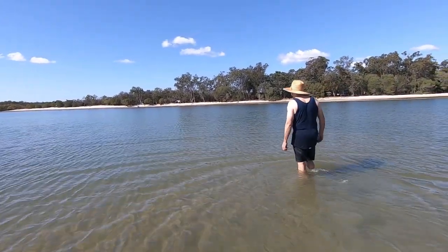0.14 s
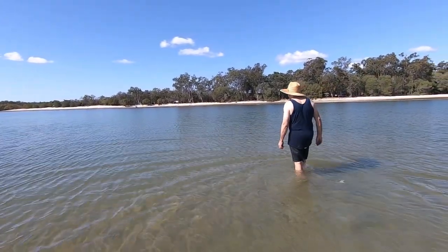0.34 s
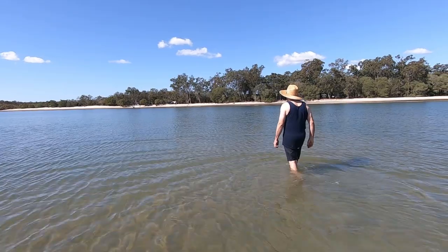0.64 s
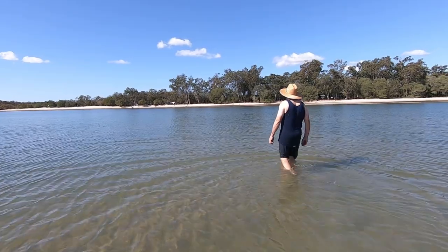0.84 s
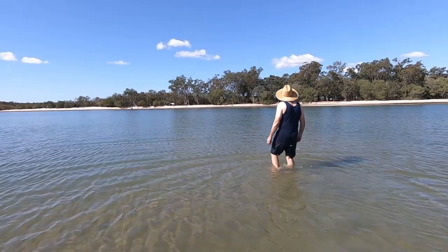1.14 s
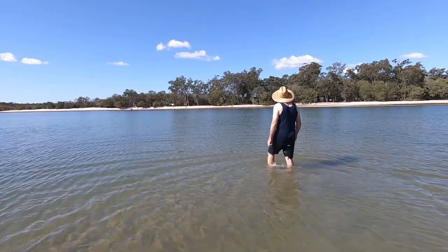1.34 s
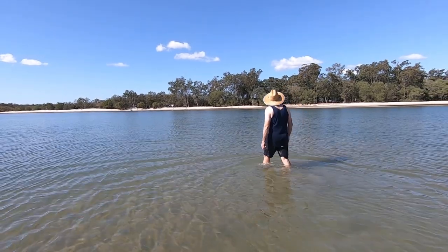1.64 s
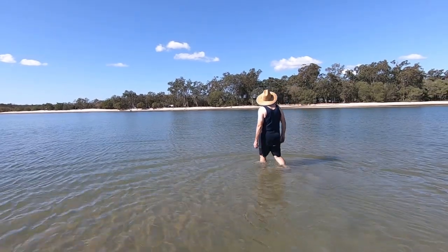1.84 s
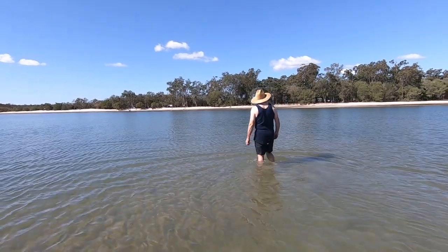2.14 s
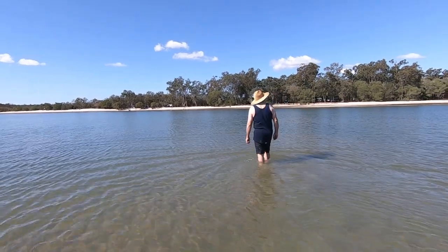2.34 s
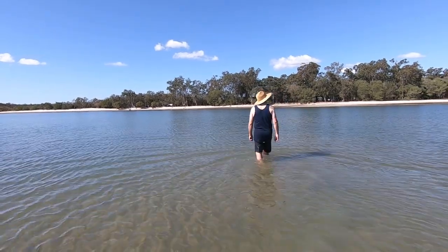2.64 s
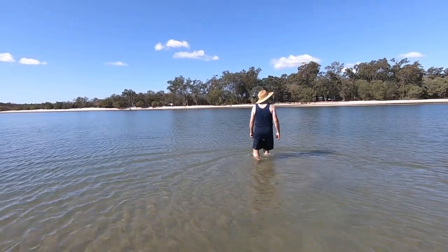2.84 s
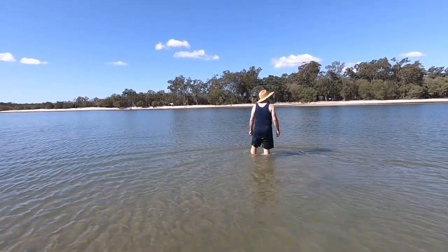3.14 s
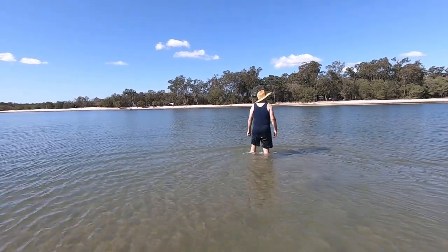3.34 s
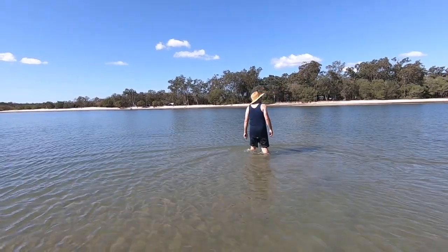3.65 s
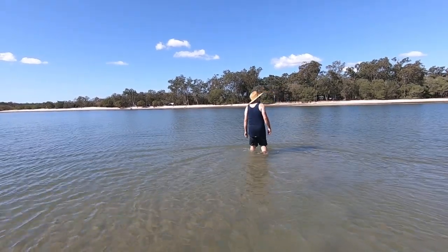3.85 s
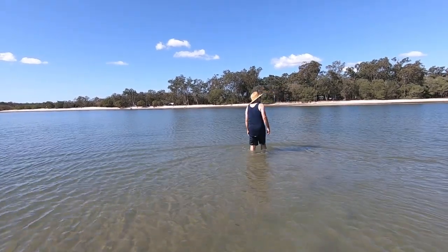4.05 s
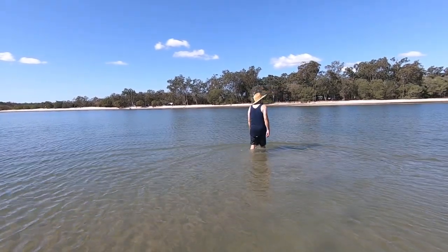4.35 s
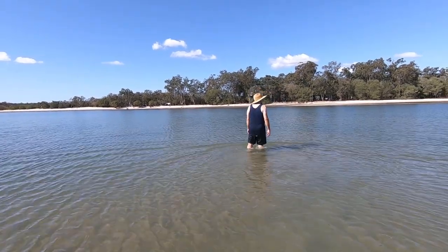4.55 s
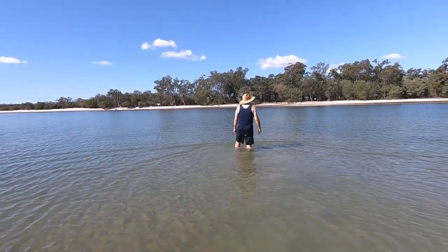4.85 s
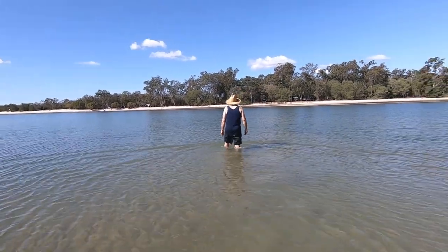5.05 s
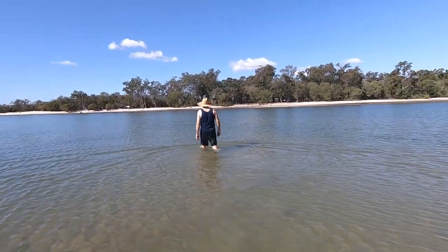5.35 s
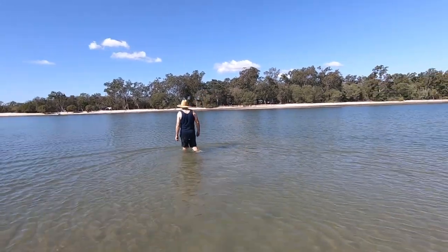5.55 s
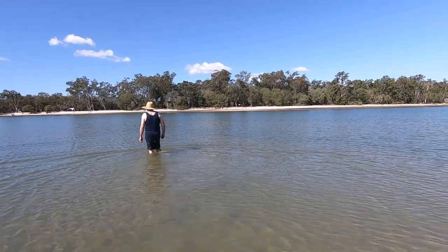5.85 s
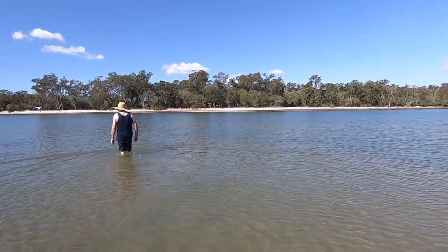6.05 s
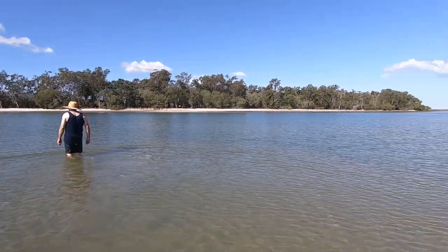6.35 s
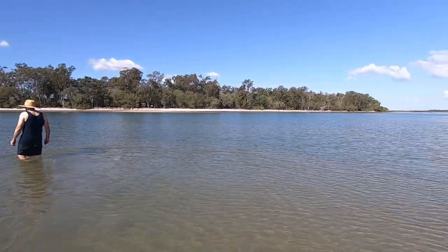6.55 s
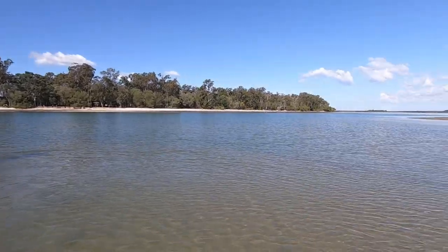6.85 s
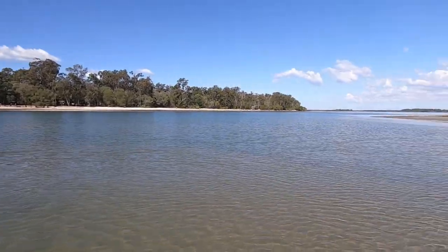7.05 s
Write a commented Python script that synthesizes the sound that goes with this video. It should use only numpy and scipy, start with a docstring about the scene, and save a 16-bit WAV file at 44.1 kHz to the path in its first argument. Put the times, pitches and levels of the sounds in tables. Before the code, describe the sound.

Close, wet wading sounds come first and loudest, slightly right of centre: sloshing surges, bubbling air pockets, bright droplets and fine spray. Uneven wind rumbles and thumps against the camera microphone, strongest around four and a half seconds. Later strides grow quieter and drift left as the camera turns. The wind then drops, uncovering soft lapping, a few drips, faint shore wash and a short wavering hum.

```python
"""Shallow water by an open shore: someone wades past a hand-held camera, close by, about a stride a second.
Each stride pushes up a wave: bubble swarms gurgle, noise grains and snaps make splash and spray, drops trickle.
Larger pockets of air plop as gliding sines, drops slap as short noise bursts, and soft ripples lap late on.
Wind noise buffets the two microphone ports apart, then drops as the camera turns; near the end a low
wavering sine hums up briefly. A faint, steady noise is the wash of the shore."""
import sys
import numpy as np
from scipy import signal
from scipy.fft import rfft, irfft
from scipy.io import wavfile
from scipy.ndimage import uniform_filter1d

SR = 44100
rng = np.random.default_rng(int(sys.argv[2]) if len(sys.argv) > 2 else 0)


def wrap_up_sound(samples):
    """Save the sound to the file named by the first command line argument, as 16-bit audio."""
    columns = np.atleast_2d(samples).T
    # keep every value between -1 and 1, then stretch to whole-number steps
    tamed = np.clip(columns, -1, 1)
    steps = np.round(tamed * 32767).astype(np.int16)
    wavfile.write(sys.argv[1], SR, steps)


N = 317067
TIME = np.arange(N) / SR
FREQS = np.fft.rfftfreq(N, 1 / SR)


def amp(db):
    """Decibels to gain."""
    return 10 ** (np.asarray(db) / 20)


def unit(x):
    """Scales to rms 1."""
    return x / np.sqrt(np.mean(x ** 2) + 1e-20)


def follow(rows, t=TIME):
    """The columns of a curve table, joined by straight lines, at the times t."""
    s, *columns = np.transpose(rows)
    return [np.interp(t, s, column) for column in columns]


def read(points):
    """A spectrum table on the frequency grid, straight over log frequency."""
    hz, value = np.transpose(points)
    return np.interp(np.log(FREQS + 1), np.log(hz), value)


def shaped(x, spectrum):
    """Filters x by a spectrum table and scales it to rms 1."""
    return unit(irfft(rfft(x) * amp(read(spectrum)), N))


def drift(hz):
    """Random motion up to about the rate hz, rms 1."""
    return unit(irfft(rfft(rng.standard_normal(N)) * np.exp(-(FREQS / hz) ** 2), N))


def bump(s, length):
    """A smooth swell of height 1 around time s; length is its width at 1/e of the height."""
    return np.exp(-(2 * (TIME - s) / length) ** 2)


def panned(pan_db):
    """Left and right gains whose mean is 1; positive is to the left."""
    ratio = amp(np.atleast_1d(pan_db))
    return 2 * np.array([ratio, np.ones_like(ratio)]) / (1 + ratio)


def add(mix, s, sound):
    """Lays a sound into the mix from time s on."""
    part = mix[..., max(round(s * SR), 0):][..., :sound.shape[-1]]
    part += sound[..., :part.shape[-1]]


def bubble(hz, glide, swell):
    """A pocket of air rings as it pinches off; its pitch slides as it nears the surface. Peaks at 2 swell."""
    t = np.arange(0, 8 * swell, 1 / SR) - 2 * swell
    u = np.maximum(t / (2 * swell) + 1, 0)
    envelope = (u * np.exp(1 - u)) ** 4
    # glide in octaves per second, by one octave upwards at most
    pitch = hz * np.exp2(np.minimum(glide * t, 1))
    return envelope * np.sin(2 * np.pi * np.cumsum(pitch) / SR)


def swarm(low_hz, high_hz, busy, cycles, spread_db, glide, count):
    """Bubbles of random size and pitch, more crowded where the water is busy."""
    out = np.zeros(N)
    when, kept, pitch, life, rise, size = rng.random((count, 6)).T
    hz = low_hz * (high_hz / low_hz) ** pitch
    swell = np.clip(cycles, .5, 5) * (.25 + 1.5 * life ** 2) / np.sqrt(hz * low_hz)
    # many faint bubbles, a few strong ones
    gain = amp(spread_db * np.minimum(-np.log(size + 1e-9), 4)) * np.sqrt(hz)
    slide = glide * (1.05 * rise - .3)  # most rise, some fall
    sounding = kept < busy[(when * N).astype(int)]
    for k in np.nonzero(sounding)[0]:
        add(out, when[k] * TIME[-1], gain[k] * bubble(hz[k], slide[k], swell[k]))
    # crowding changes the density, not the level
    return unit(out / np.sqrt(busy))


def patter(per_s, spread_db, decay):
    """Droplets tick on the surface as grains of noise: many faint ones, a few sharp ones."""
    chance, size = rng.random((2, N))
    ticks = chance < per_s / SR
    power = ticks * amp(spread_db * np.minimum(-np.log(size + 1e-9), 5)) ** 2
    t = np.arange(0, 12 * decay, 1 / SR) / decay
    grain_power = signal.oaconvolve(power, t ** 2 * np.exp(-1.5 * t))[:N]
    return unit(np.sqrt(abs(grain_power)) * rng.standard_normal(N))


def crackle(low_hz, high_hz, per_s, cycles, spread_db, count=36):
    """Tiny bubbles snap shut: each starts at once and rings for a few cycles on one of count pitches."""
    out, t = np.zeros(N), np.arange(700) / SR
    chance, size, kind = rng.random((3, N))
    snaps = (chance < per_s / SR) * amp(spread_db * np.minimum(-np.log(size + 1e-9), 3.5))
    pitch_index = (kind * count).astype(int)
    for k, hz in enumerate(np.geomspace(low_hz, high_hz, count)):
        ring = np.exp(-t * hz / cycles) * np.sin(2 * np.pi * hz * t * (1 + t))
        for at in np.nonzero((pitch_index == k) & (snaps > 0))[0]:
            add(out, at / SR, snaps[at] * ring)
    return unit(out)


def drips(count=300):
    """Single drips off the legs and hands: each traps a bubble that rings a little longer, mostly rising."""
    return swarm(1150, 4800, np.ones(N), cycles=3.6, spread_db=1.8, glide=9, count=count)


FROTH_S, FROTH_SHARE = .012, .3  # decay time [s] and strength of the fizz


def froth(x):
    """Each burst sets off a short fizz of smaller ones, which joins the grains into a wash."""
    t = np.arange(0, .08, 1 / SR)
    tail = rng.standard_normal(len(t)) * np.exp(-t / FROTH_S)
    random_sign = np.sign(drift(150))
    fizz = signal.oaconvolve(x * random_sign, tail / np.linalg.norm(tail))[:N]
    return x + FROTH_SHARE * fizz


def churn(x, patch_db, patch_hz, patch_s):
    """Tumbling water: clouds of bubbles come and go, each in its own part of the spectrum."""
    f, t, z = signal.stft(x, SR, nperseg=256, noverlap=192)
    across = np.fft.fftfreq(len(f), f[1])[:, None]
    along = np.fft.fftfreq(len(t), t[1])
    blur = np.exp(-(across * patch_hz) ** 2 - (along * patch_s) ** 2)
    patches = unit(np.fft.ifft2(np.fft.fft2(rng.standard_normal(z.shape)) * blur).real)
    return unit(signal.istft(z * amp(patch_db * patches), SR, nperseg=256, noverlap=192)[1][:N])


# resonances and dips of the camera housing: (centre [Hz], width [Hz], level [dB])
HOUSING = [(815, 300, 5.5), (1017, 167, -10), (1343, 260, 3.5), (1560, 160, -4.5), (1974, 440, 3.5),
           (2207, 137, -5.5), (2520, 290, 2.5), (2740, 106, -4), (3200, 600, 0), (3450, 100, -7),
           (3700, 560, 3.5), (4430, 220, 4.5), (5540, 740, 2.5), (8440, 290, -3), (9000, 590, 7.5)]


def housing(x):
    """The camera body colours what reaches the microphone ports."""
    colour_db = sum(db * np.exp(-2 * ((FREQS - hz) / width) ** 2) for hz, width, db in HOUSING)
    return irfft(rfft(x) * amp(colour_db), N)


CREST_DROP_DB = 22  # how far below its crest a splash is at the ends of its build-up and collapse
TRICKLE_S = 1.0  # water running off the leg fades by as much in this time
BUILD_CURVE = 0.95  # 1 builds evenly in dB; above 1 grows fast at first and rounds off towards the crest


def stride(crest, splash_db, build_s, collapse_s, trickle_db, lead_s=0):
    """Level in dB of one stride: the wave builds up and collapses, then water trickles off the leg."""
    t = TIME + lead_s - crest
    before, after = np.maximum(-t, 0), np.maximum(t, 0)
    wave = amp(splash_db - CREST_DROP_DB * after / collapse_s)
    trickle = amp(trickle_db - CREST_DROP_DB * (after / TRICKLE_S) ** 2)
    build_up_db = CREST_DROP_DB * (before / build_s) ** BUILD_CURVE
    return 20 * np.log10(np.hypot(wave, trickle) + 1e-12) - build_up_db


# surges of the strides close to the camera, levels before the trims in wading():
# (crest time [s], splash level [dB], build-up [s], collapse [s], trickle level [dB],
#  gurgle re splash [dB], spray re splash [dB]), the last two at the reference splash level
STRIDES = [(0.286, -45.5, 0.22, 0.3, -55.5, -3, -16), (1.366, -47, 0.31, 0.45, -65, -4, -17.5),
           (2.377, -52, 0.33, 0.6, -60, -5.5, -17.5), (2.48, -53.5, 0.11, 0.29, -84, -3, -20.5),
           (3.279, -53.5, 0.74, 0.56, -59.5, -3.5, -15), (4.161, -51.5, 0.32, 0.26, -55, -4, -16.5),
           (5.03, -59.5, 0.25, 0.48, -82, 1.5, -14), (5.998, -54.5, 0.35, 0.21, -61, -1.5, -18)]
REFERENCE_DB = -56.5  # the splash level at which the gurgle and spray of a stride are given
GURGLE_LEAD_S, GURGLE_SLOPE = 0.0077, 1  # the leg traps air before the wave breaks; dB per dB of splash
SPRAY_LEAD_S, SPRAY_SLOPE = 0.0069, 0.92  # the same for the spray
CALM_DB = -79  # splash and gurgle between strides


def stride_levels():
    """Levels in dB of splash, gurgle and spray; the last two lead a little and the spray swings less widely."""
    power = np.zeros((3, N))
    power[:2] = amp(CALM_DB) ** 2
    for *shape, gurgle_db, spray_db in STRIDES:
        gurgle_swing = GURGLE_SLOPE * (stride(*shape, GURGLE_LEAD_S) - REFERENCE_DB)
        spray_swing = SPRAY_SLOPE * (stride(*shape, SPRAY_LEAD_S) - REFERENCE_DB)
        gurgle = REFERENCE_DB + gurgle_db + gurgle_swing
        spray = REFERENCE_DB + spray_db + spray_swing
        power += amp([stride(*shape), gurgle, spray]) ** 2
    return 10 * np.log10(power + 1e-20)


# spectra of the three layers of wading: (frequency [Hz], relative level [dB per Hz])
GURGLE = [(200, 5), (350, -5), (520, -2), (750, 1.5), (950, -5.5), (1200, -9), (2000, -57.5)]
SPLASH = [(500, -15), (900, 2), (1200, -1), (2000, -3), (3200, -2.5), (4200, -11), (5200, -14.5),
          (8000, -32.5)]
SPRAY = [(2500, -12.5), (4000, 2.5), (4900, 2), (6500, 6), (8000, -1.5), (9000, -7), (10200, -3.5),
         (11500, -16.5), (13000, -21.5)]


def wading():
    """Every stride churns up deep gurgles, a dense froth of small bubbles and fine spray, in uneven spurts."""
    splash_db, gurgle_db, spray_db = stride_levels()
    busy = np.clip(amp(.5 * (splash_db + 51)), .5, 1)
    spurts = drift(18)

    gurgle = swarm(280, 1150, busy, cycles=2.1, spread_db=2, glide=23, count=2200)
    gurgle += patter(600, 2.4, .003)

    splash = swarm(1000, 5060, busy, cycles=1.8, spread_db=2.9, glide=18, count=11000)
    splash += 1.25 * patter(1500, 2.8, .0007)
    splash += .65 * crackle(1100, 6000, per_s=800, cycles=5.5, spread_db=3.9)
    splash += .36 * drips() / np.sqrt(2 * busy)  # drips stand out more in calm water
    splash += .6 * patter(36, 2, .0006)
    splash = churn(froth(splash), patch_db=1.8, patch_hz=520, patch_s=.025)

    spray = .7 * crackle(3800, 10500, per_s=600, cycles=14, spread_db=4.2)
    spray += patter(1100, 3.5, .0007)
    spray += .55 * patter(24, 2.4, .0004)
    spray = churn(spray, patch_db=2.4, patch_hz=900, patch_s=.025)

    # level of each layer: stride, spurts, trim
    water = shaped(gurgle, GURGLE) * amp(gurgle_db + 2 * spurts - 3)
    water += shaped(splash, SPLASH) * amp(splash_db + 1.2 * spurts - 1.1)
    water += shaped(spray, SPRAY) * amp(spray_db + 1.9 * spurts - 1.5)
    return housing(water)


# how alike the two microphone ports hear the water: (frequency [Hz], left-right likeness [-1 to 1])
LIKENESS = [(300, 1), (800, 0.81), (2500, 0.93), (4500, 0.98), (6500, 0.49), (8500, -0.47), (11000, -0.067)]


def ports(x, pan_db, corner_hz=4000, treble_share=.2):
    """Two ports hear the same sound; the body scatters the treble, which is less alike and less to one side."""
    t = np.arange(256) / SR
    scatter = rfft(rng.standard_normal(len(t)) * np.exp(-t / 0.0025), N)
    same = np.clip(read(LIKENESS), -.7, .999)
    # a quarter-turn signal of random sign, added on one side and taken off on the other
    side_gain = 1j * np.sign(scatter.real) * np.sqrt((1 - same) / (1 + same))
    side = irfft(rfft(x) * side_gain, N)
    pair = np.array([x + side, x - side])
    low = irfft(rfft(pair) * np.exp(-(FREQS / corner_hz) ** 4), N)
    return low * panned(pan_db) + (pair - low) * panned(treble_share * pan_db)


# changing wind at the ports, before the ceiling in wind():
# (time [s], left rumble level [dB], right rumble level [dB])
WIND = [(0, -37.5, -37.5), (.18, -38, -37.5), (.45, -33.5, -33.5), (.65, -34.5, -29), (.95, -34.5, -33.5),
        (1.1, -38.5, -28), (1.65, -34.5, -30.5), (1.95, -35, -42.5), (2.1, -40, -41), (2.45, -34, -30),
        (2.65, -44, -34.5), (3.1, -38.5, -30.5), (3.5, -37.5, -31.5), (3.8, -33, -32), (4.4, -29, -29),
        (4.82, -40.5, -39.5), (5.18, -39.5, -33.5), (5.4, -32, -37.5), (6.02, -34.5, -37),
        (6.35, -57, -57.5), (6.7, -79, -74), (7.19, -64, -59)]
# short gusts on top of it: (peak time [s], length [s], rumble level [dB], left-right [dB])
GUSTS = [(1.145, 0.14, -26.5, 4), (1.445, 1, -37, -8), (3.227, 0.2, -33.5, 15.5), (4.117, 0.25, -27, 2.5),
         (4.339, 0.044, -28, 18), (4.497, 0.15, -24, -5.5), (4.971, 0.086, -31, -6),
         (7.18, 0.062, -46.5, -13)]


def wind_levels():
    """Rumble in dB at each port: the changing wind plus its gusts, added as power."""
    power = amp(follow(WIND)) ** 2
    for s, length, db, side_db in GUSTS:
        power += (amp(db) * panned(side_db) * bump(s, length)) ** 2
    return 10 * np.log10(power)


# spectra of the rumble and of the faster flutter: (frequency [Hz], relative level [dB per Hz])
RUMBLE = [(8, -7.5), (20, -10.5), (45, 0), (65, 0), (85, -5.5), (115, -6.5), (150, -27), (220, -29),
          (400, -100)]
BUFFET = [(70, -28.5), (120, 10.5), (160, 3), (210, -8), (290, -8), (410, -28), (700, -31.5), (1500, -87)]
# single eddies that thump a port, played 1.5 dB up and before the ceiling:
# (start time [s], envelope peak level [dB], centre [Hz], left-right [dB])
THUMPS = [(1.092, -18.5, 98, -40), (1.17, -24.5, 172, 31), (1.512, -24.5, 89.5, -38), (1.631, -25, 89, -28),
          (2.197, -27, 103, -26), (3.173, -28, 151, -18), (3.272, -23, 82, -8), (3.45, -24, 94, -24.5),
          (3.623, -36, 115, -14), (3.877, -20.5, 111, -36), (3.94, -32, 128, -26), (4.076, -22.5, 92, 31),
          (4.212, -31, 140, -13), (4.335, -35, 168, 22), (4.445, -33, 150, 5), (4.503, -30, 186, -17),
          (4.517, -12.5, 110, -39), (5.596, -22, 95, 31), (5.674, -35, 145, 21), (5.867, -28, 134, 16),
          (6.012, -34, 139, 18)]
FLUTTER_DB = (-22.5, -18.5)  # flutter relative to the rumble in a moderate wind, left and right port
MODERATE_DB, FLUTTER_SLOPE = -43.5, 0.69  # above this rumble the flutter gains this many extra dB per dB


def wind():
    """Turbulence presses on each port apart; its strongest lumps break into faster flutter and single thumps."""
    out = np.zeros((2, N))
    for port, rumble_db, moderate_db in zip(out, wind_levels(), FLUTTER_DB):
        rumble_swing = amp(3.54 * np.tanh(drift(22)))
        rumble = unit(shaped(rng.standard_normal(N), RUMBLE) * rumble_swing)
        lumps = np.tanh(abs(signal.hilbert(rumble)) / 2) ** 2.53
        flutter_swing = amp(2.1 * np.tanh(drift(16)))
        flutter = unit(shaped(rng.standard_normal(N), BUFFET) * lumps * flutter_swing)
        flutter_db = moderate_db + FLUTTER_SLOPE * np.maximum(rumble_db - MODERATE_DB, 0)
        port += amp(rumble_db) * (rumble + amp(flutter_db) * flutter)
    for s, db, hz, side_db in THUMPS:
        u = np.arange(0, 4 / hz, 1 / SR) * hz  # time in cycles
        envelope = (2 * u * np.exp(1 - 2 * u)) ** 2
        add(out, s, amp(db + 1.5) * panned(side_db) * envelope * np.sin(2 * np.pi * u))
    # the pressure of the strongest eddies levels off
    ceiling = .22
    swing = uniform_filter1d(abs(signal.hilbert(out)), 200)
    return out / (1 + (swing / ceiling) ** 4) ** (1 / 4)


# spectrum of the open shore: (frequency [Hz], relative level [dB per Hz])
AIR = [(30, -14.5), (150, 21), (300, 3), (500, -16.5), (800, 1), (2000, -13), (4500, -14), (6500, -23),
       (10000, -19.5), (11500, -36)]


def shore():
    """The faint wash of the open shore: steady shaped noise, separate at each port."""
    return amp(-62.0) * np.array([shaped(rng.standard_normal(N), AIR) for _ in range(2)])


# the largest drops and dollops that slap the surface, played level_db up:
# (peak time [s], peak level [dB], centre [Hz], spread [octaves], swell time [s])
DROPS = [(0.177, -45.5, 4000, .54, 0.004), (0.19, -38.5, 2420, 0.75, 0.0017),
         (0.287, -38, 2900, 0.62, 0.0063), (.308, -43, 2580, 0.23, 0.0014),
         (0.328, -39.5, 2350, 0.65, 0.0026), (.343, -38.5, 2400, 0.22, 0.0026),
         (0.443, -46.5, 3930, 0.39, 0.0021), (.526, -43, 2100, .35, 0.0032),
         (0.628, -49.5, 3580, 0.18, 0.0013), (0.767, -49.5, 2070, 0.25, 0.00046),
         (1.153, -42.5, 1820, 0.25, .003), (1.226, -46.5, 2900, 0.28, 0.0017),
         (1.234, -38.5, 2970, 0.5, 0.0013), (1.468, -41, 2840, 0.41, 0.002),
         (1.591, -45.5, 914, 0.59, 0.0023), (1.778, -44, 2350, 0.64, 0.0014),
         (1.795, -43, 1860, 0.42, 0.0032), (1.946, -54, 2730, .4, .002), (2.09, -52, 3700, 0.41, 0.0018),
         (2.212, -42.5, 1480, 0.44, 0.0044), (2.307, -46.5, 3240, 0.27, 0.0011),
         (2.346, -46.5, 2830, 0.69, 0.002), (2.484, -41.5, 1560, 0.22, 0.0023),
         (2.646, -41, 2990, 0.33, 0.0013), (2.758, -41, 3720, 0.51, 0.0018),
         (2.834, -45.5, 3270, 0.34, 0.00068), (3.048, -42, 2010, 0.53, 0.0021),
         (3.093, -46.5, 3180, .25, 0.0013), (3.283, -35.5, 3060, 0.87, 0.0018),
         (3.289, -38.5, 1860, 0.13, .002), (3.388, -43, 3240, 0.13, 0.0014),
         (3.587, -46.5, 3620, 0.13, 0.0018), (3.671, -44, 1460, 0.85, 0.0012),
         (3.706, -46, 2480, 0.18, .002), (3.839, -45, 3920, 0.38, 0.0012), (3.854, -46, 3720, 0.19, .0012),
         (3.865, -44, 2230, .25, 0.0012), (3.887, -51, 1970, 0.23, .0015), (3.977, -43, 2190, 0.17, 0.0016),
         (4.046, -36, 1820, 0.31, 0.0017), (4.083, -43.5, 1235, 0.77, 0.0013),
         (4.134, -45.5, 2860, 0.87, 0.0036), (4.142, -37.5, 3230, 0.33, 0.0018),
         (4.161, -47, 4680, 0.64, 0.0054), (4.175, -43.5, 1750, 0.19, 0.003),
         (4.191, -48.5, 6840, 0.14, 0.0012), (4.211, -40.5, 3080, 0.39, 0.0013),
         (4.231, -50.5, 4560, 0.41, 0.0043), (4.243, -48, 4860, 0.71, 0.002),
         (4.346, -53.5, 3580, .5, .001), (4.364, -44, 2790, 0.49, 0.0019), (4.4, -46.5, 3470, 0.5, .0022),
         (4.569, -47.5, 3200, 0.32, .0015), (4.669, -46, 3290, 0.48, 0.0017),
         (4.818, -53, 2370, 0.28, .0015), (5.011, -49.5, 3200, .45, .0012),
         (5.813, -50, 4640, 0.16, 0.0012), (5.984, -39, 2260, 0.45, 0.0013),
         (6.026, -42.5, 3200, 0.25, 0.0014), (6.168, -43.5, 1790, 0.16, 0.0016),
         (6.282, -47.5, 2890, 0.16, .0015), (6.3, -48, 3050, 0.23, 0.0023),
         (6.337, -52.5, 1400, .2, 0.0022), (6.512, -56.5, 4800, 0.25, .0012),
         (6.53, -57, 2920, 0.62, 0.0017), (6.679, -58.5, 4030, 0.61, .0015),
         (6.829, -54.5, 2900, 0.29, .0012), (6.917, -53, 2130, 0.57, 0.0018),
         (7.012, -50, 3030, 0.44, 0.0014), (7.179, -45.5, 1890, 0.37, 0.0046)]


def drops(ring=0.18, level_db=1):
    """A drop lands with a short, bright slap and traps a small bubble; a dollop lands more broadly."""
    out, t = np.zeros(N), np.arange(2048) / SR
    f = np.fft.rfftfreq(len(t), 1 / SR) + 1
    lead = .012  # s from the start of the burst to its peak
    for s, db, hz, octaves, swell in DROPS:
        u = np.maximum((t - lead) / (1.5 * swell) + 1, 0)
        burst = rng.standard_normal(len(t)) * (u * np.exp(-u)) ** 2
        colour = np.exp(-.5 * (np.log2(f / hz) / octaves) ** 2)
        slap = irfft(rfft(burst) * colour)
        add(out, s - lead, amp(db + level_db) * slap / abs(slap).max())
        add(out, s, amp(db + level_db) * ring * bubble(hz, 7.1, 0.0028))
    return out


# large air pockets, levels before the wobble:
# (peak time [s], pitch at the peak [Hz], peak level [dB], glide [octaves/s], swell time [s])
PLOPS = [(0.234, 1316, -41.5, -7.5, .006), (0.271, 1354, -39.5, 6.5, 0.0063),
         (.277, 562, -47.5, -0.5, .004), (.432, 545, -49, -4.5, .009), (0.301, 1326, -44, 2.5, 0.0072),
         (.53, 836, -47.5, 10, 0.0064), (.583, 746, -47, 14, 0.0056), (.667, 766, -49.5, -17.5, 0.0071),
         (.395, 1930, -39, 7, 0.0018), (.725, 481, -47.5, -7, 0.004), (.742, 1940, -47.5, 9, .002),
         (.867, 2970, -50, 11.5, .002), (.88, 1190, -51, 5.5, 0.0025), (.904, 590, -48.5, -13, .004),
         (1.08, 673, -51.5, -5, .004), (1.161, 730, -49.5, -6, 0.0076), (1.234, 876, -50, 11, 0.0033),
         (1.286, 763, -50, -1, 0.0044), (1.306, 825, -48, 9.5, .003), (1.503, 566, -46.5, 6, .003),
         (1.166, 1304, -47, 16, 0.0047), (1.342, 1734, -39, -17, 0.0014), (1.361, 1400, -40.5, 24, 0.0019),
         (1.419, 763, -39, 54, .0032), (1.543, 805, -35.5, 10.5, .003), (2.089, 1366, -54, 2, .003),
         (2.214, 665, -45, 6, .0034), (2.27, 848, -46, 0, 0.004), (2.312, 347, -51.5, 13.5, .007),
         (2.344, 733, -48, 15, 0.008), (2.378, 726, -47, 14.5, .004), (2.439, 795, -42.5, 9.5, .003),
         (2.551, 798, -46, 2, .003), (2.799, 1370, -47.5, -5, .003), (2.819, 560, -51, 0.5, .004),
         (2.964, 630, -51, 13.5, .004), (2.979, 760, -35.5, 36.5, 0.0048), (2.997, 1180, -44.5, 41, 0.003),
         (3.054, 696, -43, -22, 0.0037), (3.065, 794, -38, 32, .0031), (3.087, 625, -41.5, -8, .0037),
         (3.122, 866, -42, 19.5, 0.0028), (3.164, 1260, -32.5, -4.5, .0018), (3.24, 1120, -44, 7, .004),
         (3.25, 868, -42, -14.5, 0.0045), (3.256, 1170, -44.5, 46, 0.0026), (3.332, 763, -47, 3, 0.0041),
         (3.352, 509, -49, 11.5, 0.016), (3.441, 810, -41, -11, 0.0025), (3.455, 805, -39, -0.5, .003),
         (3.675, 697, -46.5, -2, .003), (3.819, 732, -55, 7, 0.0037), (4.041, 460, -48, 14, .004),
         (4.126, 662, -42.5, -11.5, 0.0047), (4.138, 1395, -45, 6, .0044), (4.14, 771, -41.5, 10, 0.00302),
         (4.225, 545, -48, 10, .004), (4.297, 633, -40.5, -49, .003), (4.333, 548, -44.5, 6, .004),
         (4.711, 840, -52.5, 0, .004), (5.014, 755, -52, -5.5, 0.0044), (5.062, 650, -50.5, 6, .005),
         (5.019, 2180, -52.5, 7, .002), (5.291, 825, -47, 11, 0.003), (5.756, 825, -50.5, -5, .005),
         (5.783, 1007, -52.5, 12, 0.0084), (5.83, 2320, -56.5, -1, 0.0044), (5.843, 1460, -57, 15, 0.0022),
         (5.858, 674, -49.5, -3, .004), (5.875, 750, -45, 19, 0.0066), (5.897, 2120, -55, -4, .003),
         (5.912, 1150, -44.5, 24.5, 0.0059), (5.963, 476, -47.5, 5, .004), (5.998, 1243, -50, 26, 0.0044),
         (6.008, 1700, -45.5, 37, .003), (6.034, 750, -44.5, -4.5, 0.0041),
         (6.043, 2200, -45.5, 3.5, .0051), (6.05, 637, -50, -3, .004), (6.068, 2410, -48.5, 2.5, 0.0036),
         (6.172, 757, -51, 13, 0.0034), (6.213, 742, -48.5, 12.5, 0.012), (6.445, 1490, -54, 22, .005),
         (6.572, 907, -53.5, 2.5, 0.0041), (6.603, 405, -55.5, -3, 0.0078), (6.63, 1680, -62, 5, 0.012),
         (6.666, 366, -55, 10, 0.013), (6.675, 763, -50, 26, 0.0031), (6.72, 1266, -57, 1.5, .007),
         (6.765, 332, -57.5, -0.5, 0.019), (6.82, 436, -56.5, 8, .014), (6.929, 1410, -55.5, 13, 0.0036),
         (6.989, 900, -59.5, 22, .005), (7.012, 1740, -59.5, 20, .004), (7.093, 303, -55, -5, 0.016)]


def plops():
    """The large pockets of air that close behind the legs and under the ripples; they wobble as they ring."""
    out = np.zeros(N)
    for s, hz, db, glide, swell in PLOPS:
        add(out, s - 2 * swell, amp(db) * bubble(hz, glide, swell))
    wobble = .22
    return out * (1 + wobble * drift(320))


FRAGMENTS_S, FRAGMENTS_DB = .02, -12  # decay time [s] and relative level [dB] of the small bubbles


def fragments(x):
    """Large pockets and drops break up: a brief crowd of smaller bubbles follows each of them."""
    keep = np.exp(-1 / (FRAGMENTS_S * SR))
    power = signal.lfilter([1 - keep], [1, -keep], x ** 2 + 1e-20)
    crowd = swarm(480, 3200, np.ones(N), cycles=1.7, spread_db=1.8, glide=20, count=5000)
    return amp(FRAGMENTS_DB) * np.sqrt(power) * housing(crowd)


# spectrum of the lapping ripples: (frequency [Hz], relative level [dB per Hz])
LAPPING = [(200, 6), (320, 0), (450, -5.5), (580, -7), (780, -2), (1000, -3), (1300, -2.5), (2000, -6),
           (3000, -4), (4000, -13), (5200, -8.5), (7000, -22), (10000, -31.5)]


def swirl():
    """Small waves fold over with a soft swish full of gliding bubbles."""
    fizz = 1.15 * swarm(301, 2200, np.ones(N), cycles=4.2, spread_db=1.7, glide=12, count=1600)
    fizz += rng.standard_normal(N)
    fizz += .42 * crackle(2000, 7000, per_s=90, cycles=5, spread_db=2.6)
    fizz += .65 * patter(26, 1.7, .0007)
    return shaped(churn(fizz, patch_db=3.6, patch_hz=400, patch_s=.035), LAPPING)


# ripples that lap softly around the camera, before the split between the ports: (time [s], level [dB])
RIPPLES = [(0, -90.5), (5.68, -73), (5.8, -56), (6.25, -55), (6.42, -68.5), (6.6, -70.5), (6.7, -58.5),
           (6.86, -65.5), (7.13, -59.5), (7.19, -56.5)]
# how much of it comes from all around: (time [s], share [0-1])
AROUND = [(5.9, 0.1), (6.3, 0.4), (6.55, 0.88)]


def ripples(pan_db, around_db=-1):
    """The wake laps on the side of the wader and, as the camera turns away, all around it."""
    level_db, = follow(RIPPLES)
    share = np.clip(follow(AROUND)[0], 0, 1)
    around = amp(around_db) * np.array([swirl(), swirl()]) * panned(.5 * pan_db)
    beside = ports(swirl(), pan_db)
    return amp(level_db) * (np.sqrt(1 - share) * beside + np.sqrt(2 * share) * around)


# swells of the low hum, rms levels before the wavering: (peak time [s], length [s], level [dB])
HUM = [(6.22, 0.52, -58.5), (6.899, 0.16, -50), (7.042, 0.12, -44.5)]
HUM_HZ = 112.4


def hum():
    """A low, nearly pure hum that wavers a little in pitch and level and swells near the end."""
    level = sum(amp(db) * bump(s, length) for s, length, db in HUM)
    level = level * amp(3.4 * drift(25))
    pitch = HUM_HZ * (1 + 0.0092 * drift(7.7))
    return level * np.sqrt(2) * np.sin(2 * np.pi * np.cumsum(pitch) / SR)


# where the wader is heard from the camera, in full below the treble: (time [s], left-right [dB])
BEARING = [(0, -6.5), (1.4, -5), (2.4, -3.5), (4.4, -3.5), (5.2, 0), (6, 3), (6.5, 6.5), (7.19, 12)]


def scene():
    """Water near the camera, the faint wash of the open shore, wind and hum."""
    pan_db, = follow(BEARING)
    large = plops() + drops()
    water = ports(wading() + large + fragments(large), pan_db) + ripples(pan_db)
    return water + shore() + wind() + hum()


EDGE_HZ = 12700


def record(dry):
    """The recorder's band limit: a steep low-pass filter."""
    low_pass = signal.firwin(511, EDGE_HZ, window=("kaiser", 9), fs=SR)
    return signal.oaconvolve(dry, low_pass[None], "same")


dry = scene()
out = record(dry)
wrap_up_sound(out)
```